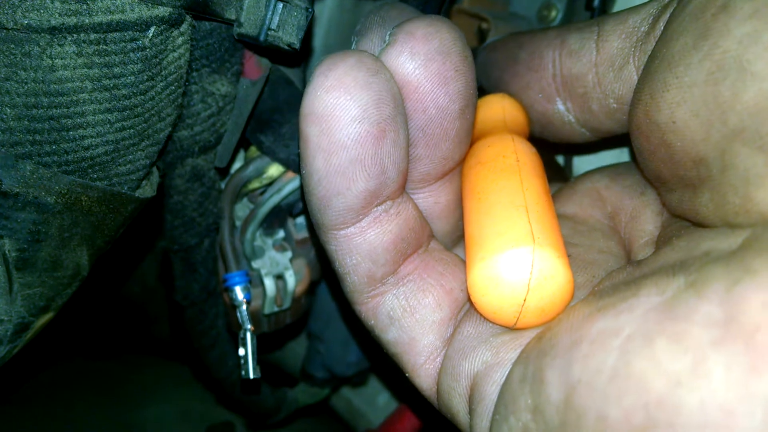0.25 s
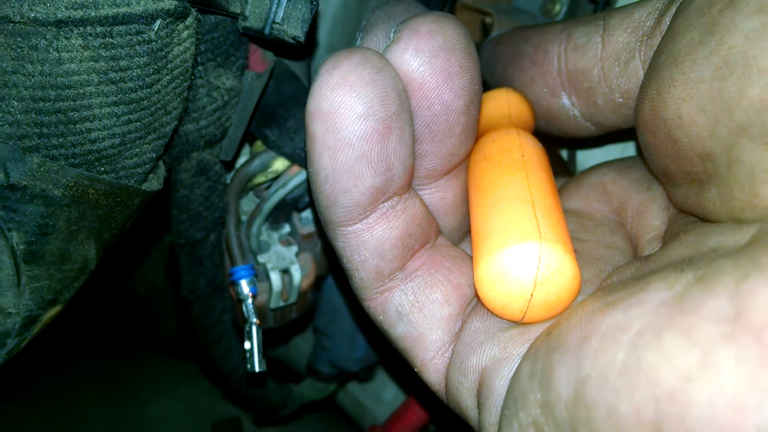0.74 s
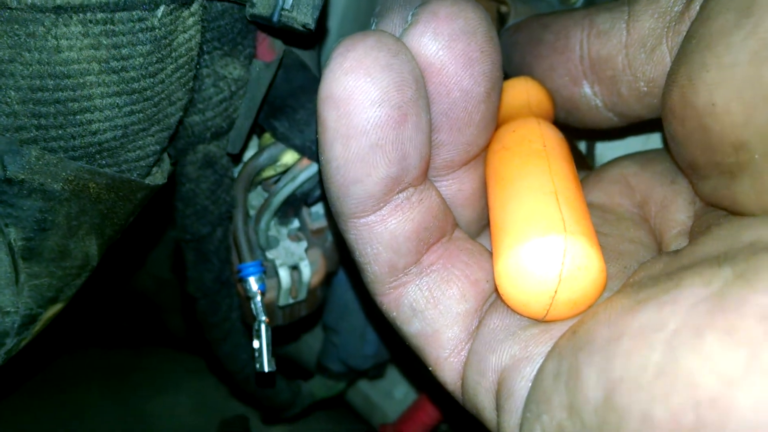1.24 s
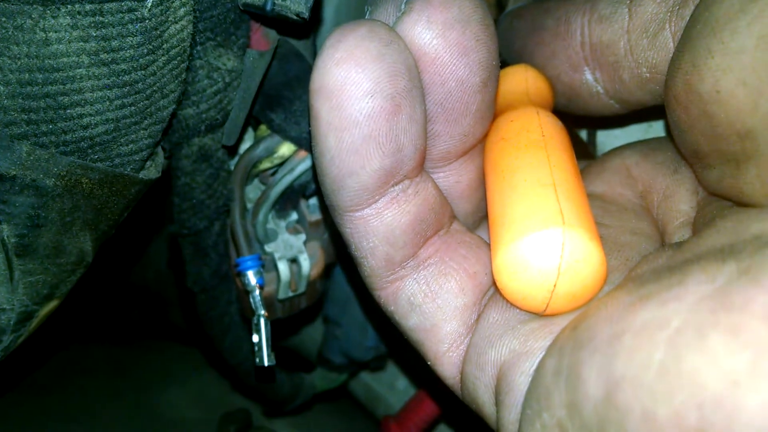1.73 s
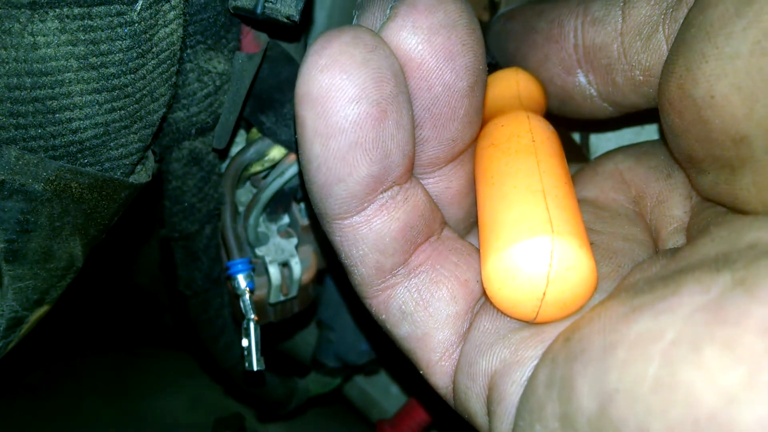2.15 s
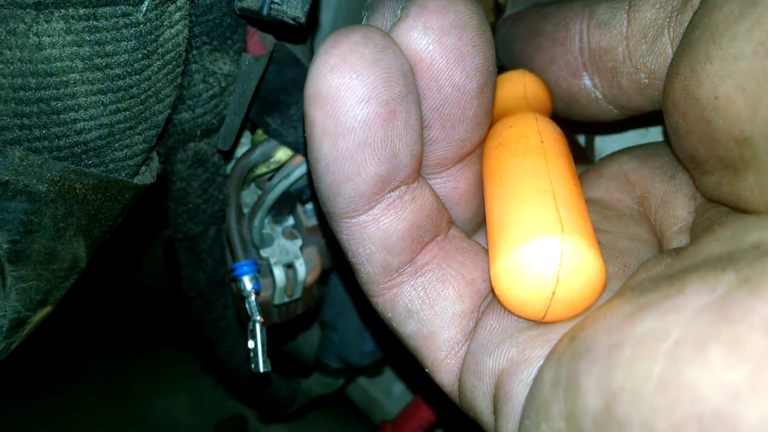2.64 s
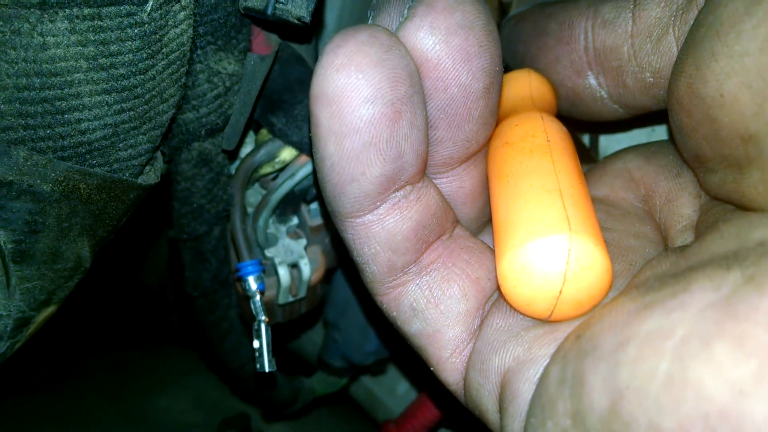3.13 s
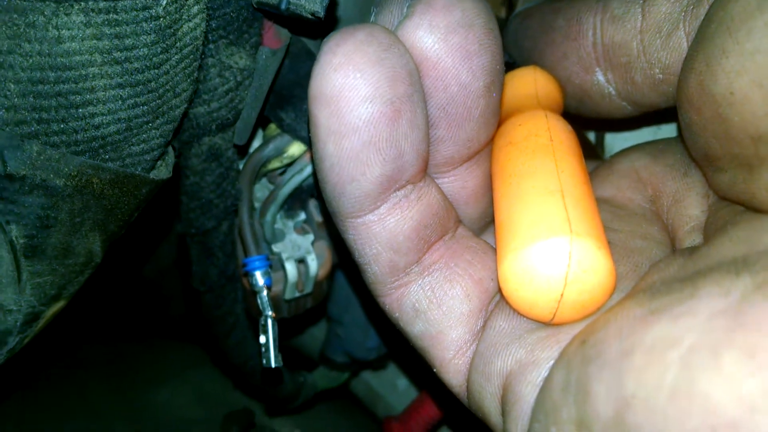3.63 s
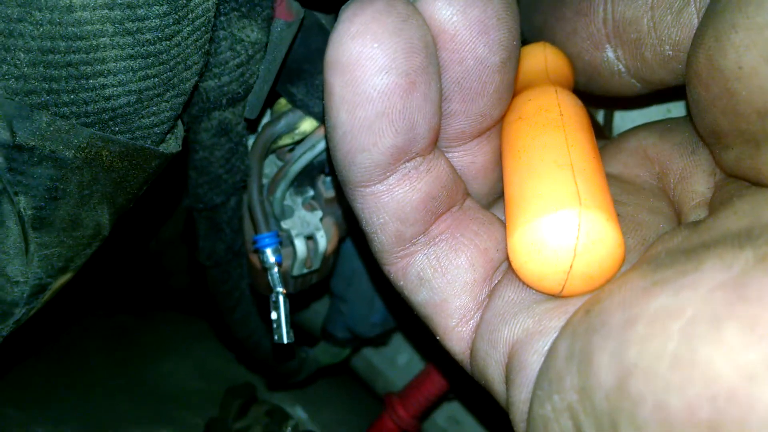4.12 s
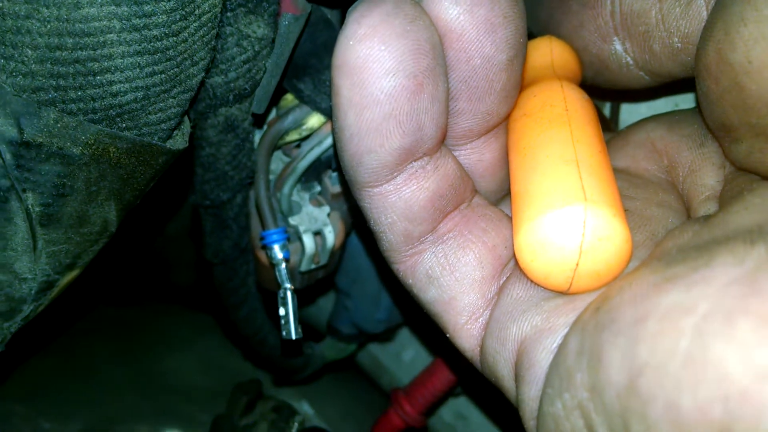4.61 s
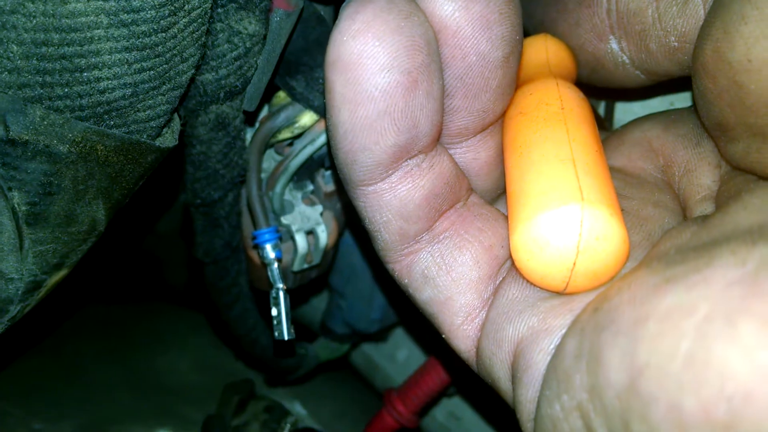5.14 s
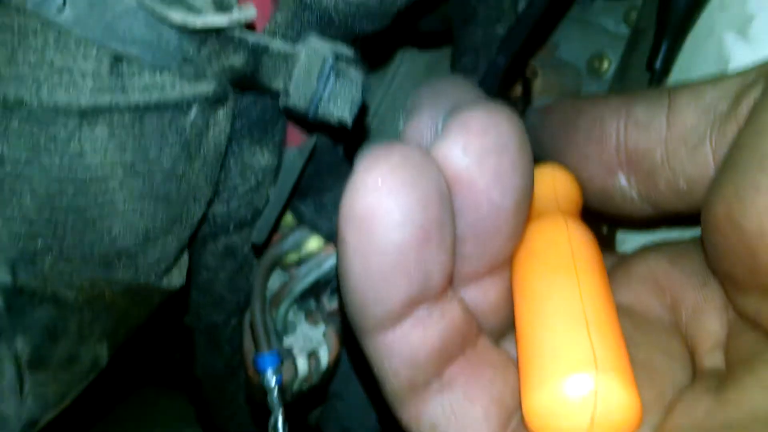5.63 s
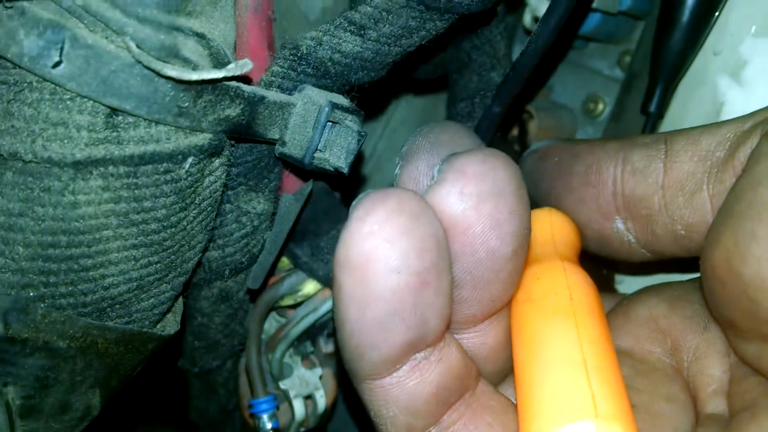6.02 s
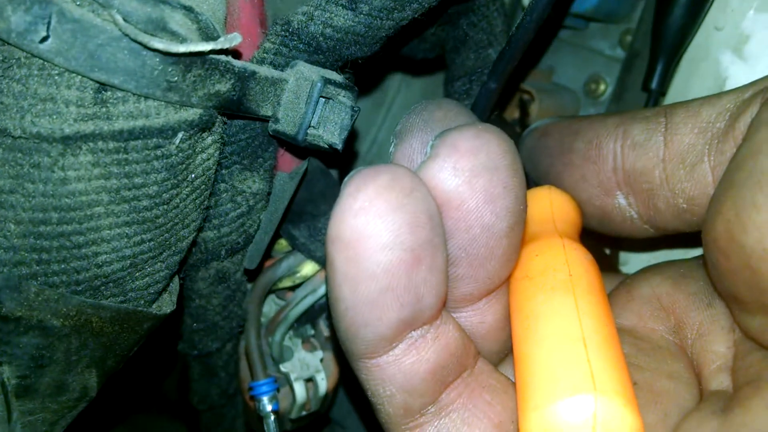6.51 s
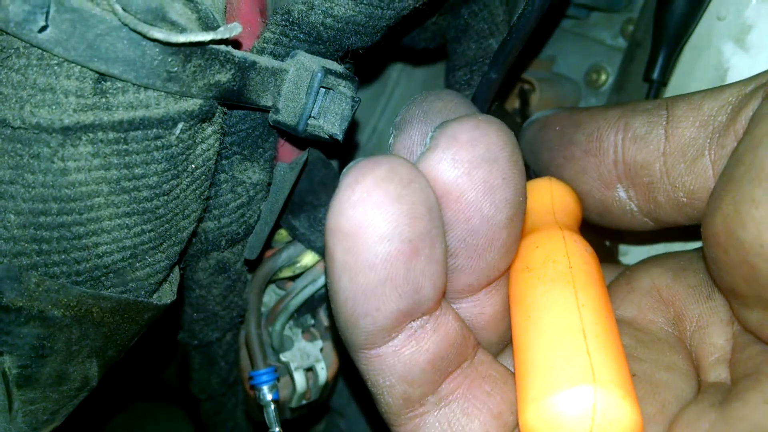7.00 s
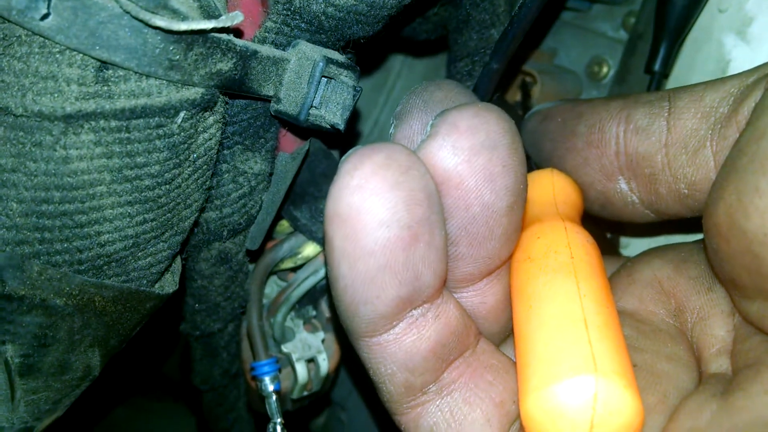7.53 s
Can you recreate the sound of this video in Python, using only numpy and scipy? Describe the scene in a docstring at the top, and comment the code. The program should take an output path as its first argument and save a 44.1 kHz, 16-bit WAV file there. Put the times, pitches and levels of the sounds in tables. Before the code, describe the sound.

An engine hums low in a vehicle cabin over a soft rumble and rush, growing louder in the middle, then dropping lower and quieter. Very near the microphone, beneath the dashboard, a relay gives a few bright, dry clicks, rests, then clicks quickly and irregularly to the end. Loud clicks briefly push the background down. Barely audible are a thin pulsing whine, a hand rubbing a tool and a probe tip ticking.

```python
"""Under a vehicle's dashboard, a hand-held camera's stereo microphone close to a small relay.
The armature slams onto its core and springs back to rattle on its stop, first singly, then in a fast
uneven run. Further off, the engine hums and booms in the cabin over a rumble, a rush and a hiss.
Faint beside the relay: a pulsing electronic whine, a hand rubbing on a tool, the ticks of a probe tip.
Each loud click pushes the camera's gain down, and the background slowly swells back."""
import sys
import numpy as np
from scipy import signal
from scipy.fft import rfft, irfft, next_fast_len
from scipy.io import wavfile
from scipy.ndimage import uniform_filter1d, minimum_filter1d, map_coordinates

SR = 44100
rng = np.random.default_rng(int(sys.argv[2]) if len(sys.argv) > 2 else 0)


def int16_out(signal):
    """Quantize to a 16-bit WAV file."""
    q = np.round(np.clip(np.atleast_2d(signal).T, -1, 1) * 32767)
    wavfile.write(sys.argv[1], SR, q.astype(np.int16))


N = 342113
TIME = np.arange(N) / SR

# engine speed: (time [s], firing tone [Hz])
ENGINE_SPEED = [(0.0, 150.9), (0.91, 158.3), (1.17, 135), (1.58, 119.3), (2.01, 125.9), (4.28, 128.7),
                (4.6, 133.6), (5.02, 131.9), (5.22, 113.5), (5.44, 106.2), (6.27, 101), (7.76, 100.3)]
# engine load: (time [s], level over easy running [dB])
ENGINE_LOAD = [(0, 0.5), (0.95, -3), (1.5, 5), (1.7, 1.5), (3.2, 3.5), (3.62, 3), (3.87, 13), (3.97, 9),
               (4.45, 11.5), (4.6, 6.5), (5.1, 6.5), (5.4, 1.5), (7.76, -6)]
# the hum dips or swells briefly: (time [s], half length [s], change [dB])
HUM_DIPS = [(1.257, 0.016, 8), (1.332, 0.014, -20), (1.42, 0.022, -11), (1.95, 0.017, -29),
            (2.267, 0.019, -14), (2.782, 0.046, -17), (3.05, 0.022, -17), (4.026, 0.044, -23),
            (4.38, 0.03, -19), (5.057, 0.011, -12), (5.086, 0.014, 6), (5.2, 0.021, -7), (5.347, 0.04, -44)]
# colours of the background noises: (frequency [Hz], relative density [dB])
RUMBLE_SPECTRUM = [(15, -3), (25, -1), (50, -4), (80, -11), (110, -2.5), (170, -4), (280, -8), (400, -12.5),
                   (520, -15), (900, -29), (2000, -120)]
RUSH_SPECTRUM = [(150, -120), (350, -24), (550, -3), (680, -3), (810, 0.5), (1100, -6), (1400, -7),
                 (1900, -13.5), (2500, -15.5), (3300, -20.5), (4300, -28.5), (8000, -79)]
HISS_SPECTRUM = [(1000, -41), (3500, -45), (5200, 3), (6500, -2), (8000, 0.5), (10000, 1.5), (12500, 5),
                 (14700, 5), (15400, -19), (16000, -33)]
# resonances of the cabin air: (frequency [Hz], width [Hz], gain [dB])
CABIN_MODES = [(77.3, 13, 1.5), (130.3, 6.5, 0), (203.5, 11.4, -1.5), (245.8, 9.8, -8.5), (313, 6.9, -2),
               (399.2, 18.2, -6.5), (452.8, 6, -5.5)]
# the armature hits the core: (time [s], relative level [dB], housing knock re frame [dB])
PULL_INS = [(0.6234, -12.5, -24), (0.6400, -17, -23), (1.5647, -13.5, -20), (4.4770, -11, -20.5),
            (4.9176, -12.5, -25), (5.3129, -11, -28), (5.7204, -22, -23), (5.8559, -11.5, -33),
            (6.0734, -16.5, -22), (6.4978, -13, -23.5), (6.8286, -14.5, -27), (7.149, -13.5, -26),
            (7.4047, -21, -22), (7.6360, -12.5, -25.5)]
# the armature hits its back stop: (time [s], relative level [dB], housing knock re frame [dB],
# first bounce [ms], bounce re hit [dB], housing ring [Hz], ring gain [dB])
DROP_OUTS = [(0.6314, -20.5, -17, 3.2, -9, 3890, 6), (0.7318, -14.5, -24, 0.64, 1.5, 5090, 7),
             (1.5669, -12, -17.5, 0.8, -4.5, 4600, 9), (4.5969, -12.5, -8, 0.84, -5.5, 4590, 24.5),
             (5.0650, -21.5, -9, 3.4, -10.5, 3635, 2), (5.5496, -17.5, -8, 0.96, -0.5, 3590, 15),
             (5.7167, -18.5, -28, 2.1, -2, 5270, 11), (5.8125, -20, -17, 2, -2.5, 2960, 11),
             (5.8877, -22.5, -14, 3.5, -11, 3380, -7), (6.0643, -19, -16, 3, -13, 4700, 13),
             (6.2646, -23, -3.5, 2.0, -7.5, 3530, 16), (6.6122, -18.5, -22.5, 3.3, 2.5, 5600, 12),
             (7.0010, -21.5, -10.5, 3.4, -2.5, 3020, 13), (7.1327, -23.5, -19, 3.4, -2, 3990, 5),
             (7.2241, -25, -11, 3.9, -1, 3960, 8), (7.5202, -23, -12, 3.85, 2.5, 4030, 13)]
# the metal frame, armature closed and open: (frequency [Hz], width [Hz], left gain [dB], right gain [dB])
CLOSED_MODES = [(4550, 570, -26, -24), (5230, 367, -17.5, -16), (6390, 330, -7.5, -12.5),
                (6940, 240, -7.5, -11.5), (7350, 510, -5.5, -14.5), (8370, 410, 0.0, -10),
                (10260, 400, -6.0, -1), (11850, 250, -2, -2.5), (12120, 300, -7, -4),
                (13300, 360, -6.5, -8), (14030, 360, -7, -2.5), (15350, 600, -4, -10)]
OPEN_MODES = [(4900, 2600, -15.5, -19), (6200, 430, -8.5, -14), (7580, 490, -3.5, -5.5),
              (9100, 230, -10.0, -18), (9810, 320, -13.5, -2.5), (11110, 420, -3.0, -3),
              (12100, 1000, -11.5, -7), (12970, 370, -4.0, -1.5), (14200, 540, -3, -5), (14940, 340, -4, 1),
              (15070, 170, -0.5, 1)]
# resonances of the plastic housing: (frequency [Hz], width [Hz], gain [dB])
HOUSING_MODES = [(1540, 850, -2), (2800, 320, 4.5), (3160, 80, 9), (3417, 157, 10.5), (4450, 113, 4.5)]
# the space under the dashboard: (frequency [Hz], time to fall 60 dB [s])
FOOTWELL_DECAY = [(3500, .14), (6000, .04), (14000, .021)]
# the hand shifts on the tool: (time [s], half length [s], level [dB])
HAND_RUBS = [(1.275, .035, -52), (1.331, 0.0096, -49), (3.424, 0.041, -43.5), (5.618, 0.053, -40.5)]
# the probe tip touches: (time [s], relative level [dB])
PROBE_TICKS = [(1.952, -46.5), (2.193, -50.5), (3.401, -56), (3.488, -51), (4.897, -43)]
# how alike the two microphone ports hear the cabin and the clicks: (frequency [Hz], likeness [0-1])
AMBIENT_LIKENESS = [(40, 1), (130, 0.66), (500, 0.44), (1200, 0.95), (4000, 1), (12000, 0.8)]
CLICK_LIKENESS = [(3500, 0.87), (6000, 0.58), (8500, 0.87), (14000, 1)]
# their stereo balance: (frequency [Hz], left minus right [dB])
AMBIENT_BALANCE = [(50, -3.5), (130, -4.5), (260, -3), (600, 0), (1300, -2), (4000, -0.5), (12000, -1.5)]
CLICK_BALANCE = [(2500, 0), (3500, .5), (14000, 0)]
# the left port's phase lag on top of its delay: (frequency [Hz], lag [rad])
PORT_PHASE = [(30, 0.22), (125, 1.09), (550, 1.22), (1400, 0.049), (2500, 0.032)]

BOOM_HZ, UPPER_BOOM_HZ, BOOM_WIDTH_HZ = 133, 205, 53  # where the cabin booms under the hum
LEAD_S, IMPACT_MS, SETTLE_MS = .005, 0.3, 4.5  # a click's run-up; decay of its hit and of its chatter
CLICK_MS = (np.arange(SR // 15) / SR - LEAD_S) * 1000  # time from the hit


def amp(db):
    """Decibels to gain."""
    return 10 ** (np.asarray(db) / 20)


def unit(x):
    """Scale to rms 1."""
    return x / np.sqrt(np.mean(x ** 2) + 1e-20)


def along(points, hz):
    """Read (frequency, value) points on a log axis."""
    freqs, values = np.transpose(points)
    return np.interp(np.log(hz + 1), np.log(freqs + 1), values)


def curve(points):
    """Read (time, value) points at every sample."""
    return np.interp(TIME, *np.transpose(points))


def wobble(rate):
    """A smooth random curve, rate knots a second."""
    return map_coordinates(rng.standard_normal(int(N * rate / SR) + 4), [TIME * rate])


def filtered(x, response):
    """x through a complex frequency response."""
    n = x.shape[-1]
    padded = next_fast_len(n + n // 2)
    return irfft(rfft(x, padded) * response(np.fft.rfftfreq(padded, 1 / SR)), padded)[..., :n]


def ring(x, modes):
    """x through damped resonances of alternating sign, with one gain for both ports or one for each."""
    def response(f):
        return sum((-1) ** k * amp(db)[:, None] * 1j * f * width / (hz * hz - f * f + 1j * f * width)
                   for k, (hz, width, *db) in enumerate(modes))
    return filtered(x, response)


def noise(spectrum):
    """Two unrelated noises of one colour, rms 1."""
    return unit(filtered(rng.standard_normal((2, N)), lambda f: amp(along(spectrum, f))))


def add(track, s, sound):
    """Mix a short sound into a track at time s."""
    part = track[:, round(s * SR):][:, :sound.shape[-1]]
    part += sound[:, :part.shape[-1]]


def microphone(pair, likeness, balance, lag_ms=.392):
    """A mid and a side signal reach the two ports; the left is late and inverted against the right."""
    spread = lambda f: np.arccos(np.clip(along(likeness, f), 0, 1)) / 2
    mid, side = filtered(pair, lambda f: np.array([np.cos(spread(f)), np.sin(spread(f))]))
    phase = lambda f: np.pi - 2 * np.pi * f * lag_ms / 1000 - along(PORT_PHASE, f)
    halves = np.array([[.5], [-.5]])
    ports = lambda f: amp(halves * along(balance, f)) * np.exp(1j * halves * phase(f))
    return filtered(np.array([mid + side, mid - side]), ports)


def engine(hum_db=-29.5, octave_db=-44, third_db=-54, waver_db=2.1, jitter=0.01736):
    """A firing tone and two faint overtones; tone and octave each swell near a boom of the cabin."""
    hz, load = curve(ENGINE_SPEED), curve(ENGINE_LOAD)
    boom = lambda f, centre: -10 * np.log10(1 + (2 * (f - centre) / BOOM_WIDTH_HZ) ** 2)
    dips = sum(change * np.exp(-((TIME - s) / half) ** 2) for s, half, change in HUM_DIPS)
    phase = 2 * np.pi * np.cumsum(hz * (1 + jitter * wobble(18))) / SR
    hum = amp(hum_db + boom(hz, BOOM_HZ) + load + dips + waver_db * wobble(16)) * np.sin(phase)
    for order, level in (2, octave_db + boom(2 * hz, UPPER_BOOM_HZ) + load / 2), (3, third_db):
        hum += amp(level + 0.76 * wobble(2.9)) * np.sin(order * phase)
    return np.sqrt(2) * np.array([hum, np.zeros(N)])  # all mid, no side


def cabin_noise(rumble_db=-33, rush_db=-39.5, hiss_db=-53.5, modes_db=-2, rush_db_per_octave=3):
    """Booming rumble, rush and, slightly, hiss grow with engine load; the rush also with its speed."""
    octaves, load = np.log2(curve(ENGINE_SPEED) / BOOM_HZ), curve(ENGINE_LOAD)
    rumble_gain = amp(rumble_db + 0.24 * load + 0.3 * wobble(7.7))
    rush_gain = amp(rush_db + 0.2 * load + rush_db_per_octave * octaves + 0.43 * wobble(10))
    rumble = noise(RUMBLE_SPECTRUM) + amp(modes_db) * unit(ring(rng.standard_normal((2, N)), CABIN_MODES))
    rush = noise(RUSH_SPECTRUM)
    hiss = amp(hiss_db + 0.082 * load + 0.27 * wobble(6)) * noise(HISS_SPECTRUM)
    return rumble_gain * rumble + rush_gain * rush + hiss


def opening_rush(hz=980, width_hz=260, level_db=-43, hold_s=0.46, fade_s=0.33):
    """The rush starts out stronger around 1 kHz; this band soon fades."""
    mode = [(hz, width_hz, 0)]
    band = unit(ring(ring(rng.standard_normal((2, N)), mode), mode))
    return amp(level_db) * np.exp(-np.maximum(TIME - hold_s, 0) / fade_s) * band


def whine(hz=14002, on_db=-55.5, off_db=-72, period_s=.321, pulse_s=.18):
    """A thin electronic whine pulses about three times a second and once stays on longer."""
    on = ((TIME - .05) % period_s < pulse_s) | ((TIME > 3.4) & (TIME < 3.9))
    tone = np.sqrt(2) * np.sin(2 * np.pi * hz * TIME)
    return tone * uniform_filter1d(np.where(on, amp(on_db), amp(off_db)), size=200)


def decay(start_ms, life_ms):
    """An envelope that jumps up at start_ms and dies away."""
    return (CLICK_MS >= start_ms) * np.exp(-np.abs(CLICK_MS - start_ms) / life_ms)


def armature_hit(scrape_db=-17, scrape_ms=0.87):
    """Force envelope: the armature scrapes on its hinge as it swings, then strikes."""
    scrape = amp(scrape_db) * (CLICK_MS < 0) * np.exp(-np.abs(CLICK_MS) / scrape_ms)
    return scrape + decay(0, IMPACT_MS)


def contact_force(envelope, passes=10):
    """Hard contact: a burst with this envelope that holds all frequencies about equally."""
    burst = rng.standard_normal((2, len(envelope))) * envelope
    for _ in range(passes):
        flat = irfft(np.exp(1j * np.angle(rfft(burst))), len(envelope))
        burst = envelope * np.cos(np.angle(signal.hilbert(flat)))
    return burst


def click(force, frame_modes, db, knock_db, extra_modes=()):
    """Close to the microphone, a burst of force rings the metal frame and knocks the housing."""
    sized = lambda x: x / np.sqrt(np.mean(np.sum(x ** 2, axis=-1)) / (SR / 200))  # as rms 1 for 5 ms
    heard = microphone(force, CLICK_LIKENESS, CLICK_BALANCE)
    frame = sized(ring(heard, frame_modes))
    housing = sized(ring(heard, [*HOUSING_MODES, *extra_modes]))
    return amp(db) * (frame + amp(knock_db) * housing)


def relay_pull_in(lift_db=8, touch_ms=-1.6, touch_db=-10, rebound_db=-25):
    """The contacts touch, then the armature slams onto the core and settles."""
    out = np.zeros((2, N))
    touch = amp(touch_db) * decay(touch_ms, IMPACT_MS)
    slam = touch + armature_hit() + amp(rebound_db) * decay(0, SETTLE_MS)
    for s, db, knock_db in PULL_INS:
        add(out, s - LEAD_S, click(contact_force(slam), CLOSED_MODES, db + lift_db, knock_db))
    return out


def relay_drop_out(lift_db=5.5, chatter_db=-9, ring_width_hz=110):
    """The spring throws the armature on its stop; it bounces, chatters and rings a housing resonance."""
    out = np.zeros((2, N))
    for s, db, knock_db, bounce_ms, bounce_db, ring_hz, ring_db in DROP_OUTS:
        bounce = amp(bounce_db) * decay(bounce_ms, IMPACT_MS)
        settling = np.exp(-np.maximum(CLICK_MS - bounce_ms, 0) / SETTLE_MS)
        chatter = amp(chatter_db) * (CLICK_MS >= 0) * settling
        force = contact_force(armature_hit() + bounce + chatter)
        ringing = [(ring_hz, ring_width_hz, ring_db)]
        add(out, s - LEAD_S, click(force, OPEN_MODES, db + lift_db, knock_db, ringing))
    return out


def footwell(x, delay_s=0.015, wet_db=-30):
    """The padded space under the dashboard answers after a short gap; its treble dies first."""
    hz, t, spectra = signal.stft(rng.standard_normal((2, SR // 7)), SR, nperseg=64)
    swell = np.clip(t / delay_s, 0, 1) ** 5
    fade = amp(-60 * np.maximum(t - delay_s, 0) / along(FOOTWELL_DECAY, hz)[:, None])
    tail = signal.istft(spectra * swell * fade, SR, nperseg=64)[1]
    return x + amp(wet_db) * signal.fftconvolve(x, tail / np.linalg.norm(tail[0]), axes=1)[:, :N]


def hand_rubs(grain_db=4.8):
    """Skin and cloth rub in brief, grainy, bright swells."""
    strokes = sum(amp(db) * np.exp(-((TIME - s) / half) ** 2) for s, half, db in HAND_RUBS)
    grain = amp(grain_db * wobble(400))
    friction = noise([(1500, -40), (3500, 6), (6200, 3), (11500, 14.0), (14500, 19.5), (16000, -25)])
    return strokes * unit(grain * friction)


def probe_ticks(life_s=0.0064, lift_db=4, knock_db=-2, ring_hz=5400, ring_width_hz=900, ring_db=3):
    """The probe tip ticks faintly against the wiring."""
    out, t = np.zeros((2, N)), np.arange(SR // 20) / SR
    for s, db in PROBE_TICKS:
        force = rng.standard_normal((2, len(t))) * np.exp(-t / life_s)
        add(out, s, click(force, OPEN_MODES, db + lift_db, knock_db, [(ring_hz, ring_width_hz, ring_db)]))
    return out


def scene():
    """The relay close to the microphone, the cabin all around it."""
    close = footwell(relay_pull_in() + relay_drop_out() + probe_ticks())
    ambience = engine() + cabin_noise() + opening_rush() + hand_rubs()
    return close + microphone(ambience, AMBIENT_LIKENESS, AMBIENT_BALANCE) + whine()


def gain_control(x, threshold_db=-14, depth_db=8.5, hold_s=0.16, recover_db_per_s=10.5):
    """Loud peaks pull the camera's gain down at once; it holds, then climbs back."""
    power = uniform_filter1d(np.mean(x ** 2, axis=0), size=220)
    cut_db = np.clip(10 * np.log10(np.abs(power) + 1e-12) - threshold_db, 0, depth_db)
    span, ahead = int(hold_s * SR) + 1, SR // 200
    held = -minimum_filter1d(-np.roll(cut_db, -ahead), span, origin=(span - 1) // 2)
    climb = recover_db_per_s * TIME
    released = np.maximum.accumulate(held + climb) - climb
    return x * amp(-uniform_filter1d(released, ahead))


def record(dry, top_hz=15900):
    """The camera rides its gain, clips at full scale and cuts off steeply at its band limit."""
    clipped = np.clip(gain_control(dry), -1, 1)
    return filtered(clipped, lambda f: np.exp(-(f / top_hz) ** 36))


dry = scene()
out = record(dry)
int16_out(out)
```